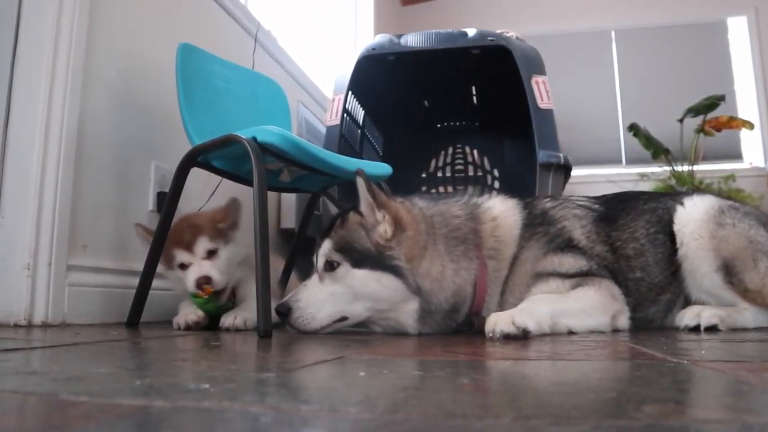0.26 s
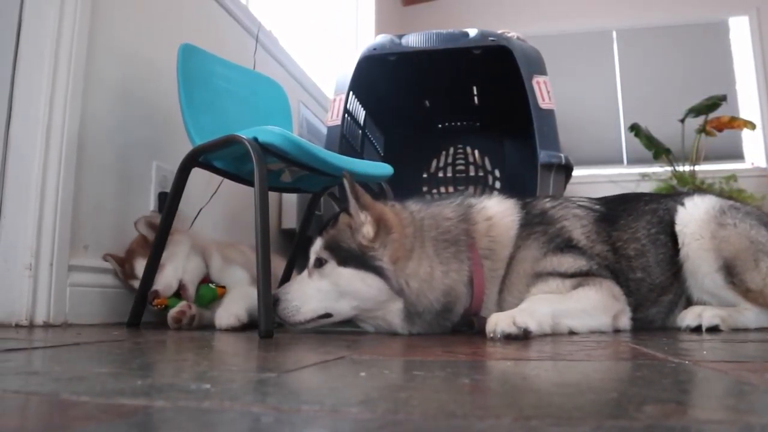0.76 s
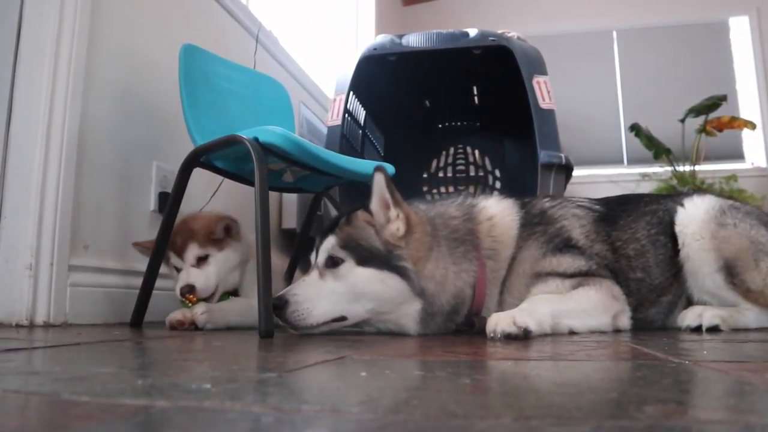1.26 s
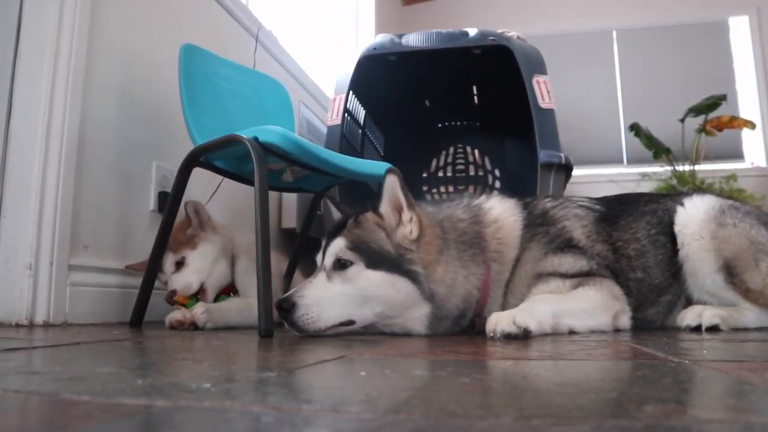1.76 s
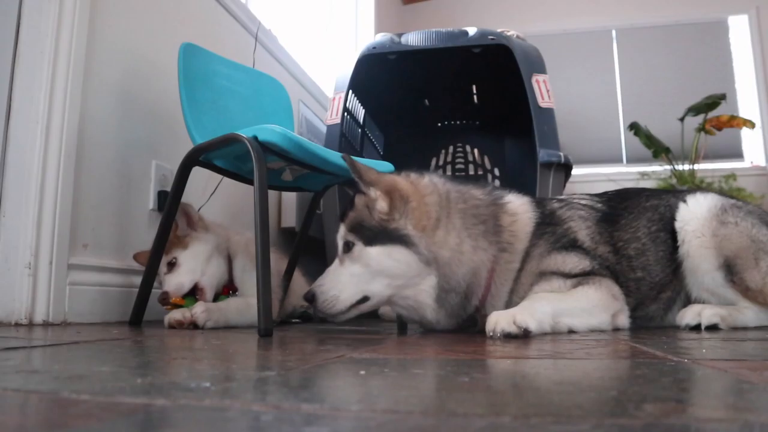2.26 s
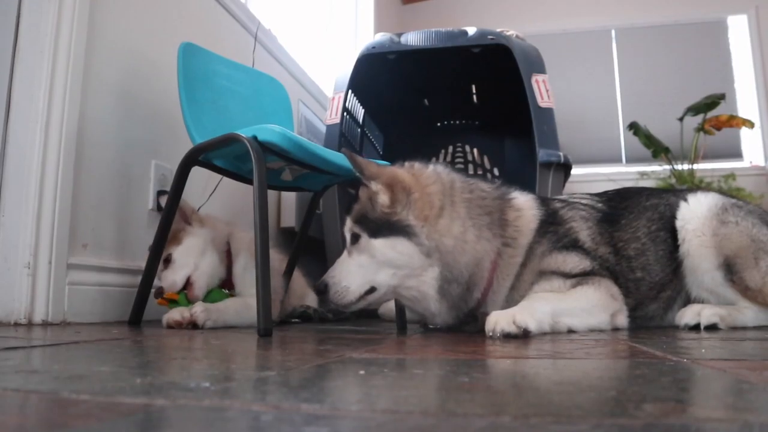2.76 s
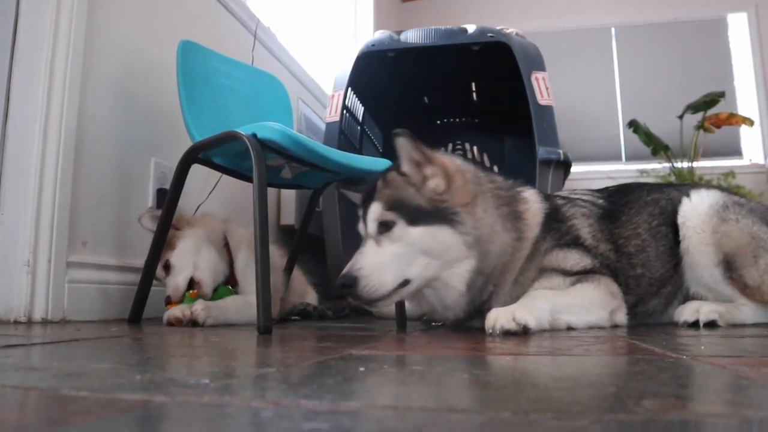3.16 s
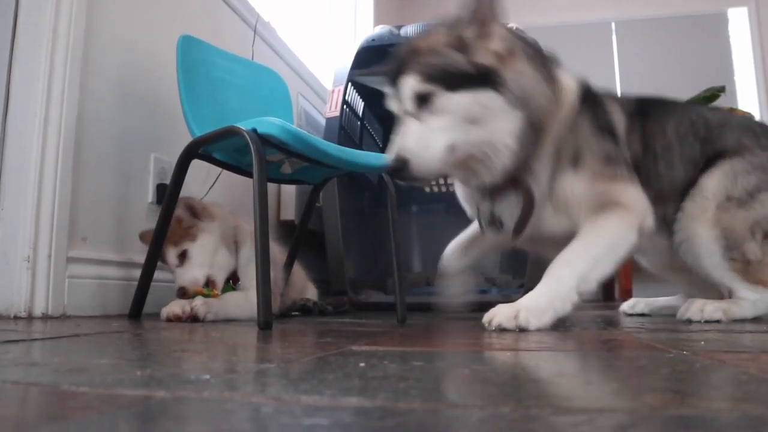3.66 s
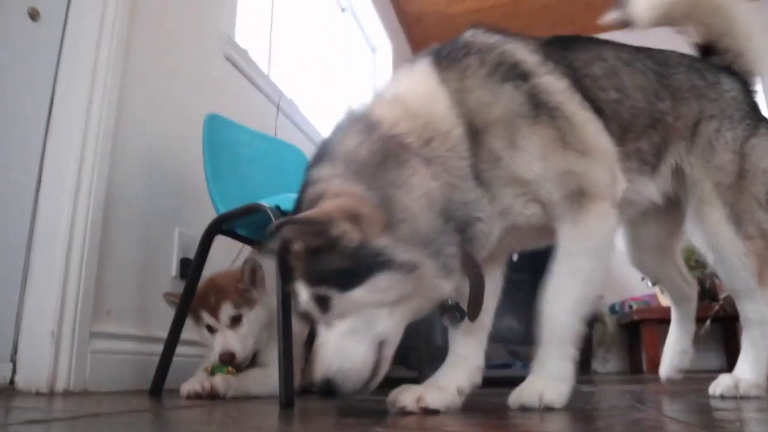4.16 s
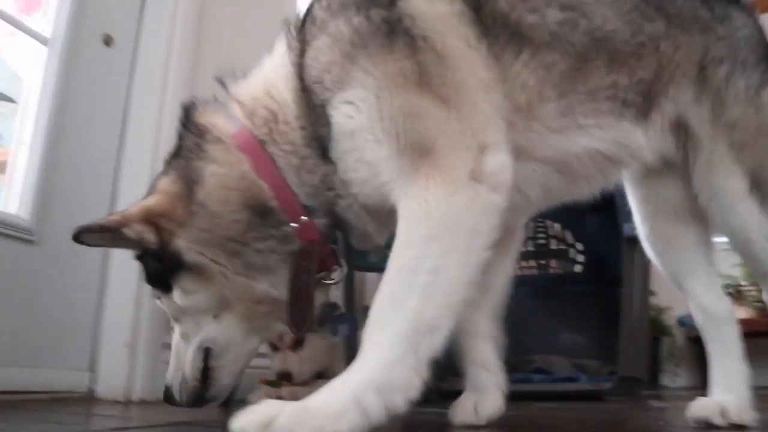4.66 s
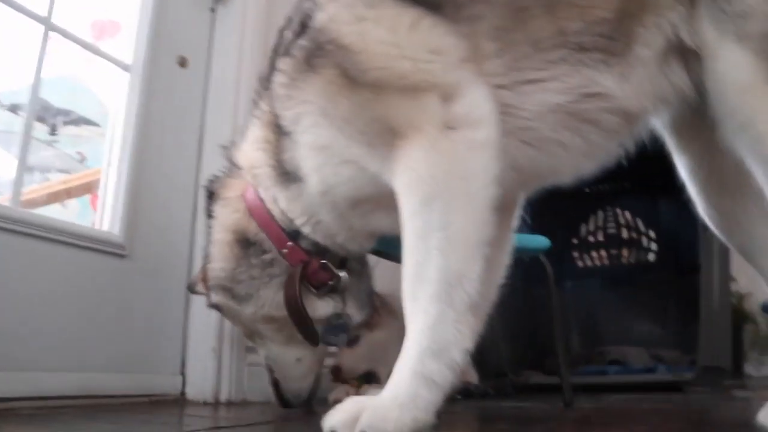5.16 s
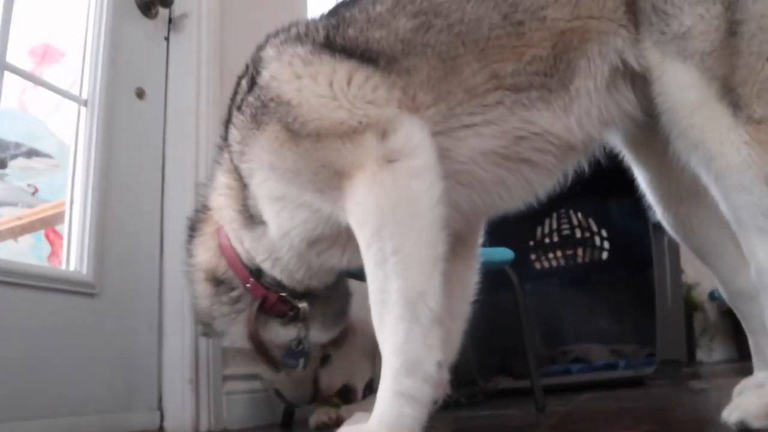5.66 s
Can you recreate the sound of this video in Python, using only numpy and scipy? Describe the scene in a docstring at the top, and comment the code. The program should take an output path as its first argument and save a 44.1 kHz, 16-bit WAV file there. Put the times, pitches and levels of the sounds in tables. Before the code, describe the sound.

A puppy chews a rubber squeaky toy on the tiled floor of a small room, close and to the left of the microphones. Short, high squeaks come at uneven intervals, some steady, some bending upward with a breathy edge. Between them are small tooth ticks, a few soft dog grunts and faint fur shuffling. In the second half a bigger dog gets up with a run of dull paw thuds, and two more squeaks follow.

```python
"""A puppy chews a rubber squeaky toy on the tiled floor of a small room, left of a pair of microphones.
Each bite drives air through the toy's reed, which squeaks, and flutters when strained. The dogs grunt,
paws and elbows thud, teeth tick on the rubber, fur shuffles on the tiles, and a collar tag jingles as a
big dog gets up. Underneath, air wheezes in the toy and the house hums faintly."""
import sys
import numpy as np
from scipy import signal
from scipy.fft import rfft, irfft
from scipy.io import wavfile
from scipy.ndimage import uniform_filter1d

SR = 44100
rng = np.random.default_rng(int(sys.argv[2]) if len(sys.argv) > 2 else 0)


def generate_wav(sig):
    """Save sig (samples, or channels by samples) to the path in sys.argv[1] as 16-bit PCM at SR."""
    pcm = np.round(np.clip(np.atleast_2d(sig).T, -1, 1) * 32767).astype(np.int16)
    wavfile.write(sys.argv[1], SR, pcm)


N = 261072
TIME = np.arange(N) / SR
CUTOFF_HZ = 16400

# the dogs moving about: (time [s], shuffle level [dB], gnawing level [dB])
MOVEMENT = [(0, -58.5, -64.5), (.33, -51, -55), (.55, -54.5, -62), (1, -55.5, -62.5), (1.3, -39.5, -47),
            (1.7, -45.5, -51), (2.15, -48, -51.5), (2.45, -43.5, -46.5), (2.9, -50.5, -57.5),
            (3.3, -55.5, -52), (3.9, -56, -50.5), (4.402, -54, -65), (4.72, -42.5, -46.5),
            (4.899, -38, -47.5), (5.1, -42.5, -48.5), (5.35, -54, -46.5), (5.92, -57, -57)]


def from_db(db):
    return 10 ** (np.asarray(db) / 20)


def rms_one(x):
    return x / np.sqrt(np.mean(x ** 2) + 1e-20)


def at_hz(points, hz):
    """Reads a curve of (frequency, value) points along a log frequency axis."""
    point_hz, values = np.transpose(points)
    return np.interp(np.log(hz), np.log(point_hz), values)


def drift(rate_hz, size=N):
    """A smooth random wander of spread 1: low-passed noise, drawn at every 40th sample."""
    pole = np.exp(-80 * np.pi * rate_hz / SR)
    white = rng.standard_normal(size // 40 + 2002)
    slow = signal.lfilter([1], [1, -2 * pole, pole ** 2], white)[2000:]
    slow *= (1 - pole ** 2) ** 1.5 / np.sqrt(1 + pole ** 2)
    return np.interp(np.arange(size) / 40, np.arange(len(slow)), slow)


def ring(kick, hz, t60):
    """A resonator: a unit click sets a sine of height 1 ringing."""
    pole, angle = from_db(-60 / (t60 * SR)), 2 * np.pi * hz / SR
    return signal.lfilter([0, np.sin(angle)], [1, -2 * pole * np.cos(angle), pole ** 2], kick + 1e-18)


def band(x, low_hz, high_hz, order):
    return signal.sosfilt(signal.butter(order, [low_hz, high_hz], "band", fs=SR, output="sos"), x)


def add(track, start_s, sound):
    i = round(start_s * SR)
    track[..., i:i + sound.shape[-1]] += sound[..., :N - i]


def stereo_bands(size):
    """Yields (centre [Hz], stereo noise) by half octaves: mono in the bass, wide in the treble."""
    # how alike the two microphones hear diffuse sound: (frequency [Hz], likeness [ratio])
    likeness = [(60, 1), (240, 0.89), (950, 0.45), (3770, -0.38), (15000, -0.37)]
    edges, white = 25 * 2 ** np.arange(0, 9.6, .5), rng.standard_normal((2, 2, size))
    for k, (low, high) in enumerate(zip(edges, edges[1:])):
        mid, side = band(white[k % 2], low, high, order=3)
        hz = np.sqrt(low * high)
        alike = np.clip(at_hz(likeness, hz), 0, 1)
        yield hz, np.sqrt(1 + alike) * mid + np.sqrt(1 - alike) * side * [[1], [-1]]


def swelling_noise(spectrum, swell_db, rate_hz):
    """Coloured stereo noise whose bands swell partly together, partly alone; rms 1."""
    together = drift(rate_hz)
    return rms_one(sum(from_db(at_hz(spectrum, hz) + swell_db * (together + .5 * drift(rate_hz))) * noise
                       for hz, noise in stereo_bands(N)))


def house():
    """Room tone: a faint, restless rumble and a low hum that wanders in level."""
    # colour of the room tone: (frequency [Hz], relative density [dB])
    colour = [(25, 6), (110, -14), (280, 6), (400, -18.5), (1030, -12.5), (6000, -23), (9300, -39.5),
              (10600, -32.5), (12400, -68)]
    hum = from_db(-64 + 4.7 * drift(1.3)) * np.sin(2 * np.pi * 116.5 * TIME)
    return from_db(-52.5) * swelling_noise(colour, swell_db=-5.5, rate_hz=7.5) + hum


def fur_shuffle():
    """Bodies slide on the tiles: dull noise that rises and falls with the movement."""
    # colour of fur on tile: (frequency [Hz], relative density [dB])
    colour = [(40, -10.5), (100, 0), (150, -5.5), (250, -4), (540, -7), (1260, -15), (1500, -15.5),
              (4000, -47)]
    times, level_db, _ = np.transpose(MOVEMENT)
    return from_db(np.interp(TIME, times, level_db)) * swelling_noise(colour, swell_db=2, rate_hz=21.5)


def gnawing():
    """Chewing rustles, and air wheezes at the resonance of the squeaker's tube."""
    # colour of the chewing rustle: (frequency [Hz], relative density [dB])
    colour = [(600, -50), (1000, 2), (3200, -2.5), (6000, -8), (10000, -18), (13000, -81)]
    times, _, level_db = np.transpose(MOVEMENT)
    rustle = from_db([[1.5], [-1.5]]) * swelling_noise(colour, swell_db=3.8, rate_hz=9)
    tube = rms_one(ring(rng.standard_normal(N), hz=1055, t60=0.058))
    wheeze = tube * from_db(-12 + 5 * drift(28))
    return from_db(np.interp(TIME, times, level_db)) * (rustle + pan_left(wheeze, pan_db=10))


def grunts():
    """A dog voices a few soft cycles with a closed mouth, swelling and fading."""
    # grunts: (time [s], length [s], start pitch [Hz], end pitch [Hz], level [dB],
    # relative 2nd harmonic [dB], relative 3rd harmonic [dB], swell shape [exponent])
    calls = [(0.109, 0.04, 268, 130, -22.5, -17.5, -28, 0.98),
             (1.25, 0.13, 59.6, 58.6, -32.5, -1.5, -4.5, 0.61),
             (3.051, 0.039, 294, 272, -29.5, -14.5, -33.5, 1.1),
             (5.198, 0.048, 253.8, 283, -29, -15.5, -28, 0.77)]
    out = np.zeros(N)
    for s, length, start_hz, end_hz, level_db, second_db, third_db, shape in calls:
        along = np.linspace(0, 1, round(length * SR))
        phase = 2 * np.pi * np.cumsum(start_hz + (end_hz - start_hz) * along) / SR
        overtones = from_db(second_db) * np.cos(2 * phase) + from_db(third_db) * np.sin(3 * phase)
        add(out, s, from_db(level_db) * np.sin(np.pi * along) ** shape * (np.sin(phase) + overtones))
    return out


def thuds():
    """A padded blow swells and fades as a hollow note, shorter when harder, with a dull scuff on top."""
    # paws, elbows and the dropped toy: (peak time [s], level [dB], pitch [Hz], relative scuff [dB])
    blows = [(.342, -44, 566, -3), (.515, -40, 289, -2.5), (1.115, -28, 146, -41), (1.175, -40.5, 293, -36),
             (2.69, -36, 362, 0), (3.548, -41.5, 110, -11), (3.694, -19.5, 150, -36),
             (4.142, -24.5, 222, -13.5), (4.155, -25, 310, -29), (4.503, -24.5, 124, -27.5),
             (4.583, -48.5, 206, -5), (4.765, -21, 148, -14), (4.78, -27.5, 315, -5.5),
             (4.825, -40, 306, 5.5), (4.844, -25, 240, -10), (4.858, -21.5, 227, -8),
             (4.873, -21, 343, -4.5), (4.894, -17, 217, -13), (5.005, -31, 262, -22),
             (5.014, -33, 236, -7.5), (5.031, -37, 278, -10), (5.211, -21.5, 236, -12),
             (5.225, -22, 278, -25)]
    # tiles and claws ringing in the scuff: (frequency [Hz], t60 [s])
    scrape_modes = [(470, 0.0083), (830, 0.018), (1290, 0.019)]
    lead_s, medium_width_s, medium_db = 0.04, 0.004, -24.5
    out, age = np.zeros(N), np.arange(SR // 5) / SR - lead_s
    for s, level_db, hz, scuff_db in blows:
        width = medium_width_s * from_db(0.82 * (medium_db - level_db))
        swell = np.where(age < 0, np.exp(-(age / (0.46 * width)) ** 2), np.exp(-age / width))
        note = swell * np.cos(2 * np.pi * hz * age)
        drag = np.where(age < 0, swell, np.exp(-age / (1.14 * width)))  # the scuff outlasts the note
        grit = band(rng.standard_normal(len(age)), 280, 1240, order=4)
        scuff = rms_one(sum(ring(grit, mode_hz, t60) for mode_hz, t60 in scrape_modes))
        add(out, s - lead_s, from_db(level_db) * (note + drag * from_db(scuff_db) * scuff))
    return out


def ticks():
    """A tooth or claw lands, or the tag strikes: a crack of a few milliseconds, coloured by a short ring."""
    # teeth and claws, and first the bright click of the collar tag striking its ring: (time [s], level [dB],
    # ring pitch [Hz], decay [s])
    contacts = [(0.356, -28.5, 9400, 0.0017), (1.656, -30.5, 3930, 0.0021), (1.667, -28.5, 5200, 0.0017),
                (1.9618, -36, 3500, 0.0033), (2.363, -34, 1130, 0.0077), (2.6877, -12, 5750, 0.00065),
                (2.8957, -27.5, 6100, 0.0012), (2.979, -41, 2850, 0.0015), (3.358, -39.5, 1300, 0.0028),
                (3.67, -30, 3560, 0.00097), (3.686, -37.5, 2200, 0.002), (4.142, -37, 2740, 0.0022),
                (4.255, -37.5, 1500, 0.0027), (5.011, -23.5, 1290, 0.0037), (5.795, -42, 1240, 0.0019)]
    out, age = np.zeros(N), np.arange(SR // 20) / SR
    for s, level_db, hz, decay in contacts:
        envelope = np.exp(-age / decay) * (1 - np.exp(-age / (0.26 * decay)))
        burst = rng.standard_normal(len(age)) * envelope
        crack = band(burst, hz / 8.9, min(hz * 1.31, CUTOFF_HZ), order=2)
        tick = crack + 0.43 * ring(crack, hz, t60=0.0032)
        add(out, s, from_db(level_db) * tick / np.abs(tick).max())
    return out


def collar_tag():
    """The tag touches its ring, striking each of its modes with a random strength."""
    # tag against ring: (time [s], level [dB])
    touches = [(.357, -53), (3.675, -67), (5.042, -67)]
    # modes of the tag: (frequency [Hz], relative level [dB], t60 [s])
    modes = [(6820, 3, .15), (8800, 3, .2), (13100, -5, .08), (14200, -14, .06)]
    out = np.zeros(N)
    for hz, mode_db, t60 in modes:
        clicks = np.zeros(N)
        for s, level_db in touches:
            clicks[round(s * SR)] = from_db(level_db + mode_db + rng.normal(0, 3))
        out += ring(clicks, hz, t60)
    return out


def squeaker():
    """The reed snaps shut once a cycle: harmonics that waver as the jaws reshape the toy, plus hiss."""
    # squeaks: (time-ordered rows of level [dB], attack [s], final fade [dB], tilt [dB/octave],
    # fundamental boost [dB], hollow of the bitten toy [Hz], its lift [dB], relative air leak [dB],
    # pitch curve as (time [s], pitch [Hz]))
    squeaks = [ (-19, 0.0035, 14.8, 2, 1, 2300, 4, -26, [(0.374, 1055), (0.41, 1048), (0.44, 1070),
               (0.48, 1023), (0.513, 964)]), (-17.5, 0.0052, 10.6, 1.5, 3, 3690, 8.2, -15, [(1.214, 1019),
               (1.24, 1004), (1.264, 982), (1.272, 900)]),
               (-23, 0.0057, 15, -9.5, -2.5, 3100, 11.6, -19, [(1.306, 1535), (1.35, 1542), (1.365, 1440),
               (1.379, 1600)]), (-26.5, .004, 8, -0.5, -13, 2640, 19, -6, [(1.363, 1054), (1.38, 1138)]),
               (-20, 0.002, 25, -8, -3, 3200, 12.2, -16, [(1.383, 1578), (1.398, 1577), (1.42, 1520)]),
               (-30.5, .004, 7, -11, -3.5, 4800, 19, -4, [(1.422, 1517), (1.435, 1437), (1.478, 1334)]),
               (-33, 0.0044, 12, -17, -9, 1100, 9, -25, [(1.478, 1080), (1.497, 1137)]),
               (-17, 0.0034, 10.5, -1.5, -4, 5300, 8.7, -16, [(2.593, 1004), (2.602, 1161), (2.615, 1212),
               (2.626, 1153), (2.633, 960)]), (-18.5, 0.0012, 12.3, 0, 0, 5090, 8.5, -22.5, [(3.053, 1106),
               (3.1, 1077), (3.115, 1304), (3.13, 1967), (3.143, 3104), (3.155, 2083), (3.172, 1145)]),
               (-22.5, 0.0036, 1.7, 2, 2.5, 6800, 1.7, -16, [(3.402, 1141), (3.425, 1136), (3.447, 1297),
               (3.465, 1144), (3.487, 1043)]), (-19, 0.0044, 13.2, 4.5, 4, 4360, 4.9, -23, [(3.745, 1084),
               (3.765, 1106), (3.78, 1309), (3.8, 1482), (3.825, 1608), (3.85, 1425), (3.868, 1317),
               (3.882, 1070)]), (-26, 0.0075, 13.6, -3, -5.5, 4950, 11, -7.5, [(4.609, 1007), (4.635, 935),
               (4.653, 880)]), (-15, 0.0061, 8.5, 1.5, 7, 3980, 8.8, -21.5, [(5.277, 1082), (5.34, 1087),
               (5.355, 1132), (5.372, 1270)]),
               (-17.5, .005, 9.6, -3, -7.5, 4050, 12.5, -15.5, [(5.38, 1382), (5.391, 1550), (5.416, 1746),
               (5.433, 1695), (5.446, 1749), (5.46, 1502), (5.468, 1360)]), ]
    # colour of the squeaker's mouth: (frequency [Hz], gain [dB])
    mouth = [(530, -38), (900, -2.5), (2150, -2.5), (3260, -1.5), (3890, -3.5), (4490, -3.5), (5500, 0),
             (6650, -3), (7770, -13), (10700, -22.5), (13400, -46), (15500, -69)]
    rest_hz, shadow_from_s, shadow_hz = 1054, 4.4, 9800
    out = np.zeros(N)
    for level_db, attack, fade_db, bright_db, first_db, hollow_hz, lift_db, air_db, bite in squeaks:
        times, bite_hz = np.transpose(sorted(bite))
        t = np.arange(times[0] - .001, times[-1] + 0.0039, 1 / SR)
        size = len(t)
        scoop = 1 - 0.254 * np.exp((t[0] - t) / 0.00157)  # the reed starts flat and catches up
        pitch = uniform_filter1d(np.interp(t, times, bite_hz), size=220) * scoop
        strain = np.clip(pitch / rest_hz - 1, 0, .5)  # a strained reed brightens, flutters and leaks
        faded_db = fade_db * np.linspace(0, 1, size) ** 4.03  # the air runs out late in the bite
        tilt_db = bright_db + 4 * strain - 0.12 * faded_db
        flutter = (.001 + .02 * strain) * drift(200, size)
        phase = 2 * np.pi * np.cumsum(pitch * (1 + flutter)) / SR
        shadowed = times[0] > shadow_from_s  # the big dog steps in front of the toy
        tone, power = 0, 1e-12
        for k in range(1, 16):
            hz = k * pitch
            colour_db = at_hz(mouth, hz) + tilt_db * np.log2(hz / 3000) + first_db * (k == 1)
            hollow_db = lift_db * np.exp(-(np.log2(hz / hollow_hz) / .27) ** 2)
            waver_db = 2.5 * drift(35, size) + 8 * strain * drift(90, size)
            shadow_db = shadowed * 27 * np.maximum(np.log2(hz / shadow_hz), 0)
            leak_db = 3 * strain * max(k - 4, 0)  # the reed no longer shuts fully
            gain = from_db(colour_db + hollow_db + waver_db - shadow_db - leak_db) * (hz < CUTOFF_HZ)
            tone += gain * np.cos(k * phase + .3 * k * k)  # the tube smears the snap
            power += gain ** 2 / 2
        hiss = band(rng.standard_normal(size), 1600, 6150, order=4) * from_db(air_db + 9.4 * strain)
        rasp = band(rng.standard_normal(size), 8100, 11150, order=4) * from_db(-16) * np.sqrt(2 * strain)
        gate = np.clip(np.minimum((t - t[0]) / max(attack, .002), (t[-1] - t) / .0035), 0, 1)
        add(out, t[0], gate * from_db(level_db - faded_db) * (tone / np.sqrt(power) + hiss + rasp))
    return out


def pan_left(x, pan_db):
    """A source on the left reaches the right microphone later and, above the bass, weaker."""
    hz, right_lag_s = np.fft.rfftfreq(N, 1 / SR), 7e-5
    lean = from_db(pan_db / 2 * hz ** 2 / (hz ** 2 + 450 ** 2))
    delay = np.exp(-2j * np.pi * hz * right_lag_s)
    spectrum = rfft(x)
    return np.array([irfft(spectrum * lean, N), irfft(spectrum / lean * delay, N)])


def room(x):
    """Dense reflections of a small room: noise that fades in fast and dies band by band."""
    # reverb time: (frequency [Hz], t60 [s])
    decay = [(200, 0.22), (1300, 0.47), (3500, 0.41), (9000, 0.39)]
    age = np.arange(SR // 2) / SR
    tail = sum(noise * from_db(-60 * age / at_hz(decay, hz)) for hz, noise in stereo_bands(len(age)))
    early_lift = from_db(5 * np.exp(-age / .03))  # floor and near walls answer first and stronger
    tail *= np.clip(age / 0.0045, 0, 1) * early_lift
    return signal.fftconvolve(x[None], tail / np.sqrt(np.sum(tail ** 2) / 2), axes=1)[:, :N]


def scene():
    """Toy and dogs close on the left, the tag in the centre, their reverb, and the noise beds."""
    toy, bumps, clicks, tag = squeaker(), thuds() + grunts(), ticks(), collar_tag()
    direct = pan_left(toy + clicks, pan_db=8) + pan_left(bumps, pan_db=2.5) + tag
    send = from_db(-2.5) * toy + from_db(-1) * bumps + from_db(-1.5) * clicks + from_db(16.5) * tag
    reverb = room(send)
    corner = pan_left(reverb[0], pan_db=2)  # the walls behind the puppy send much back from its side
    return direct + 0.56 * corner + 0.5 * reverb + fur_shuffle() + gnawing() + house()


def record(dry):
    """The microphones lose the deepest bass, and the very top is cut."""
    thinned = signal.sosfilt(signal.butter(2, 50, "high", fs=SR, output="sos"), dry)
    return signal.sosfilt(signal.cheby2(12, 70, CUTOFF_HZ, fs=SR, output="sos"), thinned)


dry = scene()
out = record(dry)
generate_wav(out)
```